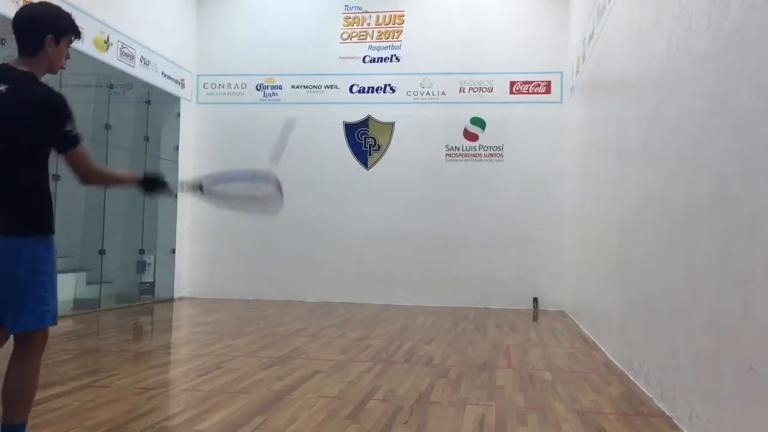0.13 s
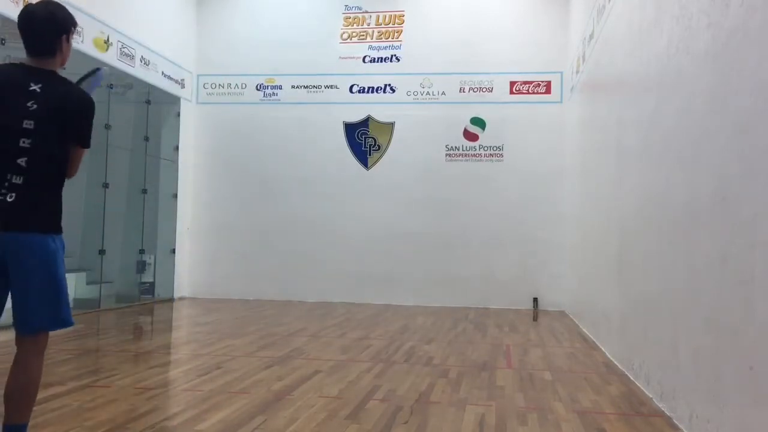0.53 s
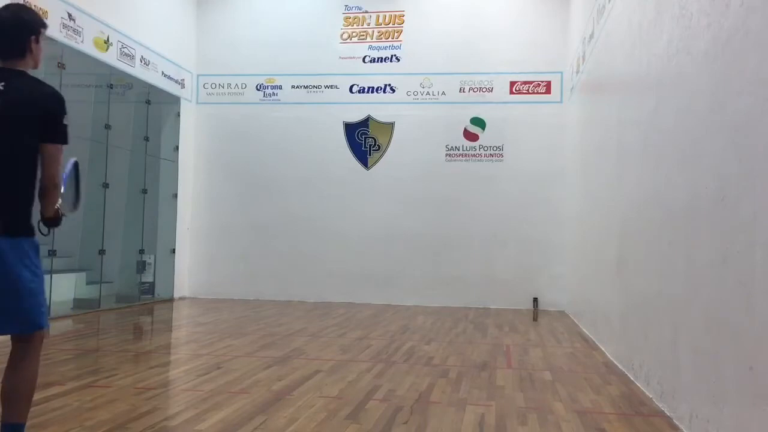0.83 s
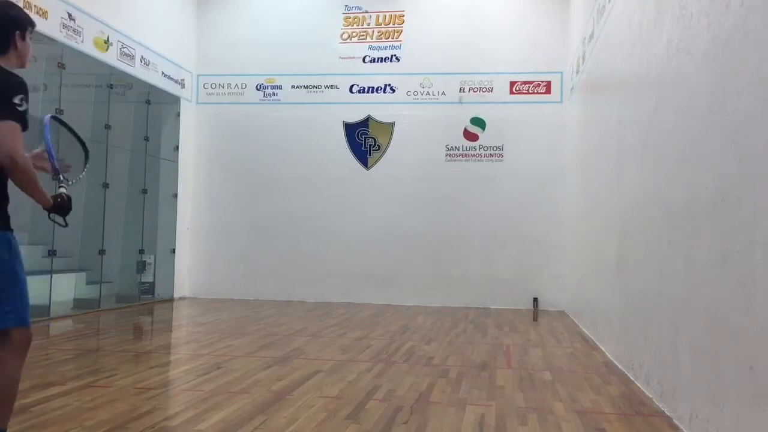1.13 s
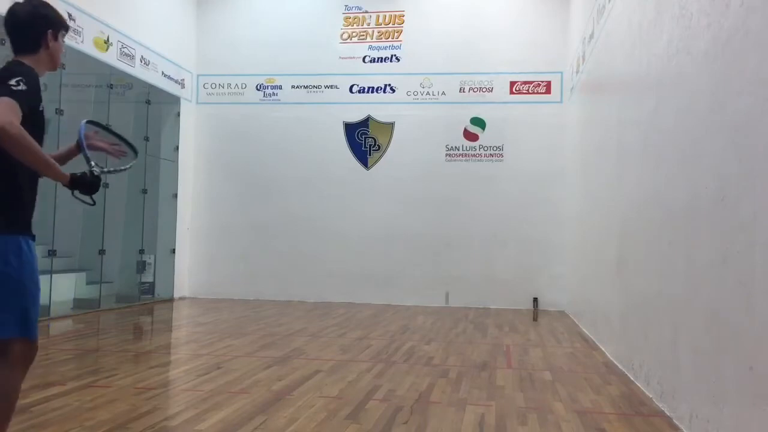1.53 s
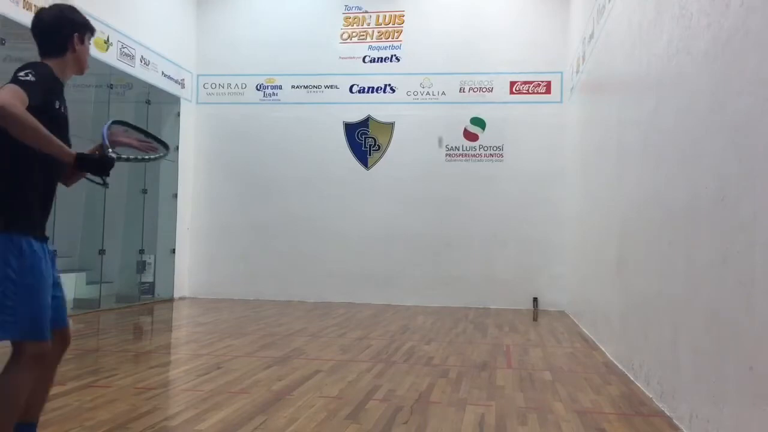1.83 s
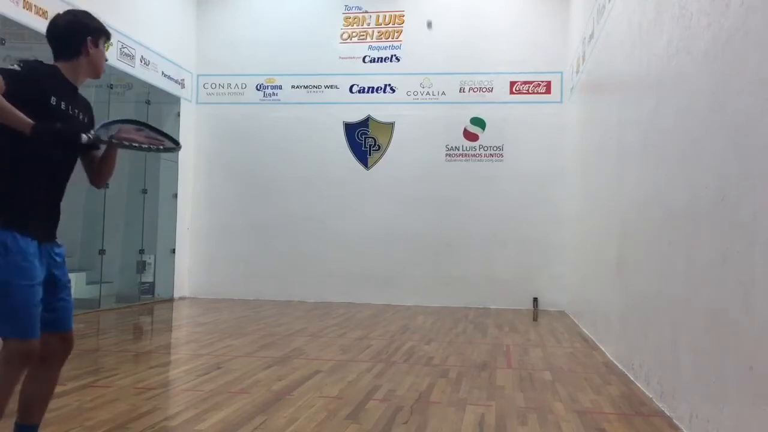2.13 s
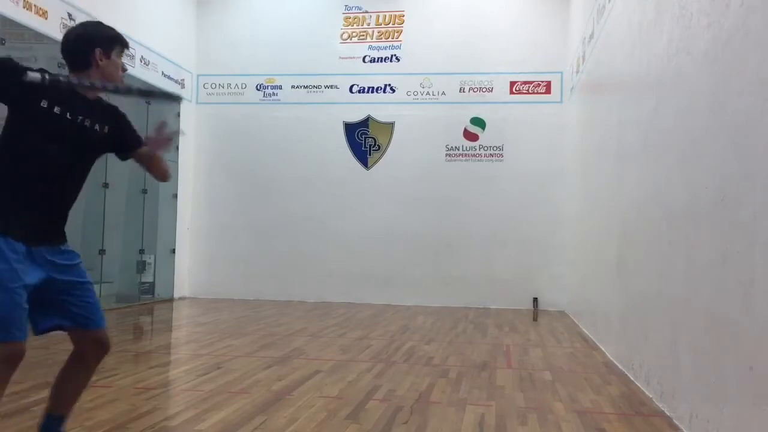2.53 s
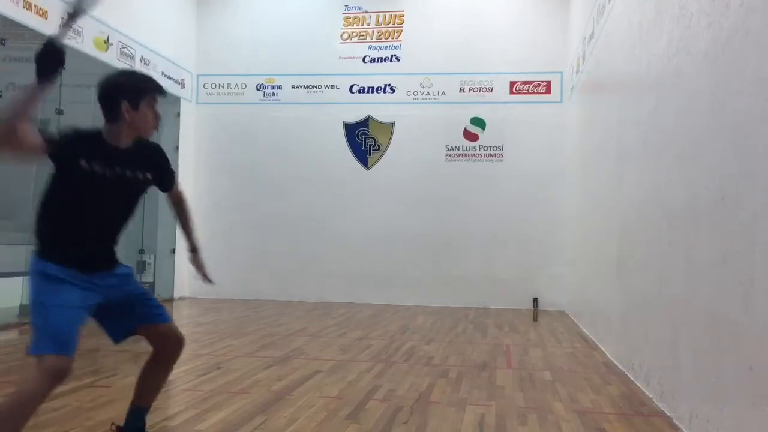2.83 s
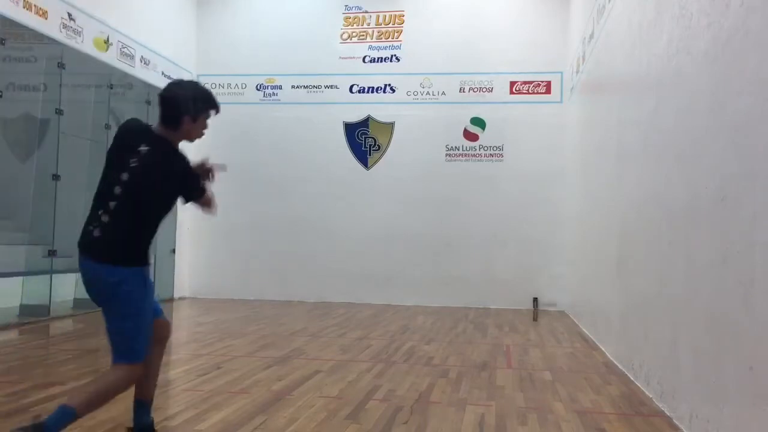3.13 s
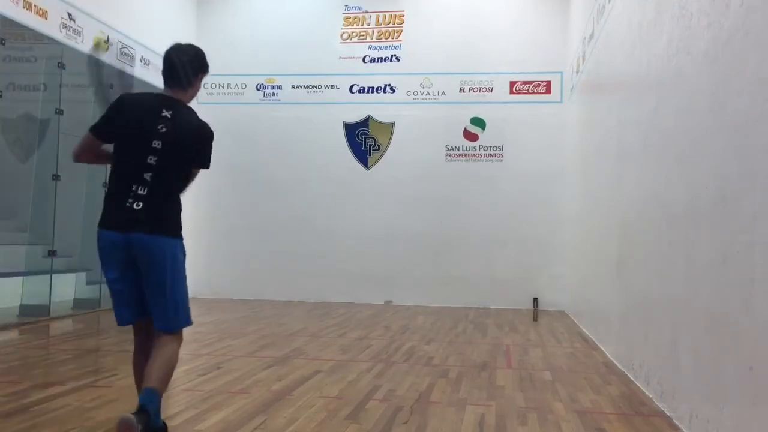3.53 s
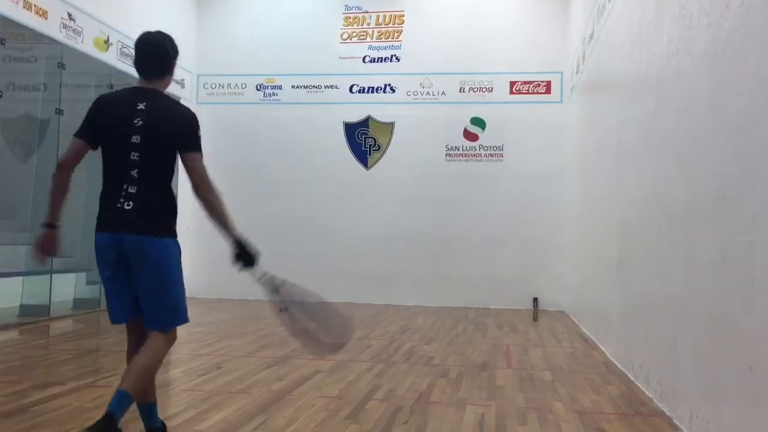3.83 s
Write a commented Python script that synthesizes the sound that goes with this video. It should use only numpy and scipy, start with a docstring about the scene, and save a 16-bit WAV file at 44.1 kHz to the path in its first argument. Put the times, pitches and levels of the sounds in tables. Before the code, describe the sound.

Hollow rubber ball hits and shoe squeaks echo through an indoor court, ending in a loud crack.

```python
"""A closed racquetball court with hard walls and a very long echo, where a player warms up.
He lobs the hollow rubber ball with a soft tap, his shoes thud and squeak, and the ball bounces on the
wooden floor. Then he drives it hard: it cracks against the front wall and drops to the floor.
Every hit sets the air inside the ball ringing. Ventilation hums underneath."""
import sys
import numpy as np
from scipy import signal
from scipy.fft import rfft, irfft
from scipy.io import wavfile
from scipy.ndimage import uniform_filter1d

SR = 44100
rng = np.random.default_rng(int(sys.argv[2]) if len(sys.argv) > 2 else 0)


def int16_out(signal):
    """Quantize to a 16-bit WAV file."""
    q = np.round(np.clip(np.atleast_2d(signal).T, -1, 1) * 32767)
    wavfile.write(sys.argv[1], SR, q.astype(np.int16))


N = 176400

# Hits of the ball: start_s, level_db, ring_hz, extra_ring_db
LOB_TAPS = [(.277, -2, 885, 2.5), (.35, -1, 895, 1), (.912, -6.5, 915, 2)]   # on the strings, then the front wall
BOUNCES = [(-.55, -7.5, 880, 1.5), (1.711, -.2, 830, .7), (3.47, -5, 880, 6)]   # the first comes before the start, so only its echo is heard
DRIVE = (3.172, 0, 880, 0)
WALL_HIT = (3.25, 0, 850, 0)
# Squeaks: start_s, level_db, pitch_hz, extra_squeal_db, length_s. The one at 0.912 s is the ball skidding on
# the front wall; the others are shoes.
SQUEAKS = [(.615, -24, 1530, 19, .06), (.912, -8, 2980, 5, .035), (1.324, -.3, 6450, 2.5, .028)]
# Footsteps on the springy floor: start_s, level_db
STEPS = [(.07, 2), (1.33, -1), (2.22, 0)]
# How strong each kind of knock is from bass to treble: frequency_hz, level_db
TAP_TONE = [(100, 6), (270, 6), (370, -4), (520, 4), (700, 0), (1000, 1.5), (2000, -8.5), (4000, -17),
            (6500, -18), (9000, -29)]
BOUNCE_TONE = [(40, -1), (75, 26), (105, 24), (145, 30), (200, 20), (280, 20), (370, 19), (500, 0),
               (640, 5), (780, 15), (1100, 18), (1400, 7.5), (1800, 8), (3000, 0), (5500, -6), (9000, -19)]
DRIVE_TONE = [(60, 14), (150, 18), (280, 29), (390, 28.5), (510, 16), (640, 26), (780, 35), (1100, 33.5),
              (1350, 20), (1700, 26), (2200, 14), (3200, 13), (6000, 9.5), (9000, -1)]
WALL_TONE = [(60, 15), (130, 24), (210, 35), (330, 30), (500, 23.5), (680, 31.5), (1050, 33), (1300, 31),
             (1500, 25), (1800, 24), (2700, 22), (4500, 18.5), (6500, 18.5), (9000, 9)]
SCUFF_TONE = [(100, 0), (250, 19), (380, 6), (600, 0), (800, 4), (915, 16), (1050, 7), (1400, 4),
              (2500, -3), (4000, -8.5), (6000, -9), (9000, -11.5)]
STEP_TONE = [(40, 0), (130, 17), (200, 9), (270, 13), (420, -3), (1000, -6), (4000, -14), (9000, -40)]
# The air ringing inside the ball: level_db, fade_s (a fade is the time to fall by 60 dB)
TAP_RING = (19, .055)
BOUNCE_RING = (26, .052)
HARD_RING = (34, .028)
# Strong early echoes: delay_s, level_db (compared with the direct sound)
RACQUET_ECHOES = [(.012, 11), (.021, 10), (.0365, 8), (.046, 4)]
FLOOR_ECHOES = [(.011, 4), (.02, 1)]
WALL_ECHOES = [(.012, -1), (.016, -3), (.081, -5), (.089, -5), (.106, -5)]
# Paths to the microphone: direct_db, treble_limit_hz, gap_s (the wait before the long echo)
RACQUET_PATH = (-30, 2000, .003)
FLOOR_PATH = (-24, 7000, .001)
WALL_PATH = (-18.5, 12000, .001)
SHOE_PATH = (-18, 10000, .003)
# How long the court keeps echoing: frequency_hz, fade_s
COURT_FADE = [(80, 4.5), (250, 6), (500, 6), (900, 5.8), (1800, 4.8), (3200, 3.7), (5000, 2.25),
              (7000, 1.55), (10000, 1.0)]
# The rush of the ventilation: frequency_hz, level_db_per_hz
VENT_TONE = [(20, -92), (40, -70), (58, -56), (75, -51), (100, -64), (150, -62.5), (270, -63), (350, -73),
             (480, -75), (700, -73.5), (850, -67.5), (1000, -73), (1300, -77.5), (2000, -82), (3000, -88),
             (4400, -92), (5000, -103.5), (6000, -104), (9000, -118)]

SHORT = 4096   # samples in one knock, squeak or early echo


def ball(hits, tone, ring, path, echoes):
    """Each hit is a knock that sets the hollow ball ringing and echoes round the court."""
    ring_db, fade_s = ring
    out = np.zeros(N)
    for start_s, level_db, ring_hz, extra_ring_db in hits:
        hit = from_db(level_db) * knock(tone, ring_hz, ring_db + extra_ring_db, fade_s)
        out += place(court(hit, path, echoes), start_s)
    return out


def knock(tone, ring_hz=1, ring_db=-200, fade_s=1):
    """A sudden knock with the given tone. The ring of the ball's air is silent unless asked for."""
    hz = np.arange(SHORT // 2 + 1) * SR / SHORT
    width_hz = np.log(1000) / (np.pi * fade_s)
    ring = from_db(ring_db) / (1 + ((hz - ring_hz) / width_hz) ** 2)
    spectrum = np.hypot(from_db(at_hz(tone, hz)), ring)
    # Keep the tone but pack the energy at the very start (minimum phase).
    cepstrum = irfft(np.log(spectrum))
    cepstrum[1:SHORT // 2] *= 2
    cepstrum[SHORT // 2 + 1:] = 0
    return irfft(np.exp(rfft(cepstrum)))


def footsteps():
    """Soles thud on the floorboards."""
    return sum(place(court(from_db(level_db) * knock(STEP_TONE), FLOOR_PATH, []), start_s)
               for start_s, level_db in STEPS)


def squeaks(squeal_db=-15, overtone_step_db=-8, glide_share=.15):
    """A slipping sole, or the ball skidding on the front wall, gives a short rising squeal, with a scuff
    halfway through."""
    t = np.arange(SHORT) / SR
    out = np.zeros(N)
    for start_s, level_db, pitch_hz, extra_squeal_db, length_s in SQUEAKS:
        progress = np.minimum(t / length_s, 1)
        slip = np.sin(np.pi * progress)
        rising_hz = pitch_hz * (1 + glide_share * (progress - .5))
        phase = 2 * np.pi * np.cumsum(rising_hz) / SR
        squeal = sum(from_db(overtone_step_db * k) * np.sin((k + 1) * phase) for k in range(3))
        squeal *= from_db(squeal_db + extra_squeal_db) * slip / np.linalg.norm(slip)
        scuff = place(knock(SCUFF_TONE), length_s / 2)[:SHORT]
        out += place(court(from_db(level_db) * (scuff + squeal), SHOE_PATH, []), start_s)
    return out


def court(sound, path, echoes, build_s=.008, flutter_db=1.8, flutter_s=.005, gain_db=15):
    """The direct sound, early echoes off the walls, then a long fluttering tail whose treble dies first."""
    direct_db, treble_limit_hz, gap_s = path
    hz, times_s, noise = signal.stft(rng.standard_normal(N + SR), SR, nperseg=512)
    fade = from_db(-60 * times_s / at_hz(COURT_FADE, hz)[:, None])
    _, tail = signal.istft(noise * fade, SR)
    t = np.arange(len(tail)) / SR
    flutter = np.interp(t / flutter_s, np.arange(SHORT), rng.standard_normal(SHORT))
    build_up = 1 - np.exp(-np.maximum(t - gap_s, 0) / build_s)
    response = tail * build_up * from_db(flutter_db * flutter) / np.sqrt(SR)
    response[:SHORT] += from_db(direct_db) * low_pass(arrival(), treble_limit_hz)
    for delay_s, level_db in echoes:
        i = int(delay_s * SR)
        response[i:i + SHORT] += from_db(direct_db + level_db) * arrival()
    return signal.fftconvolve(sound, response) * from_db(gain_db)


def arrival(split_hz=1700, scatter_s=.007):
    """One arrival of a sound: a clean click in the bass, scattered over milliseconds in the treble."""
    t = np.arange(SHORT) / SR
    click = 1. * (t == 0)
    scatter = rng.standard_normal(SHORT) * np.exp(-t / scatter_s)
    high_pass = signal.butter(2, split_hz, "high", fs=SR, output="sos")
    treble = signal.sosfilt(high_pass, scatter / np.linalg.norm(scatter))
    return low_pass(click, split_hz) + treble


def ventilation(hum_hz=75.3, hum_db=-40):
    """A steady rush of air with a low fan hum."""
    hz = np.arange(N // 2 + 1) * SR / N
    spectrum = rfft(rng.standard_normal(N)) * from_db(at_hz(VENT_TONE, hz))
    rush = irfft(spectrum, N) * np.sqrt(SR / 2)
    phase = 2 * np.pi * (hum_hz * np.arange(N) / SR + rng.random())
    return rush + from_db(hum_db) * np.sqrt(2) * np.sin(phase)


def from_db(db):
    """Turn decibels into a number to multiply by."""
    return 10 ** (np.asarray(db) / 20)


def at_hz(table, hz):
    """Read between a table's rows, with every octave equally wide."""
    row_hz, values = np.transpose(table)
    return np.interp(np.log(np.maximum(hz, 1)), np.log(row_hz), values)


def place(sound, start_s):
    """Start a sound at a given time, which may lie before the beginning."""
    i = int(round(start_s * SR))
    return np.pad(sound[max(-i, 0):], (max(i, 0), N))[:N]


def low_pass(sound, hz):
    """Soften the treble above hz."""
    return signal.sosfilt(signal.butter(2, hz, fs=SR, output="sos"), sound)


def scene():
    """All sounds of the court at one microphone."""
    lob = ball(LOB_TAPS, TAP_TONE, TAP_RING, RACQUET_PATH, RACQUET_ECHOES)
    bounces = ball(BOUNCES, BOUNCE_TONE, BOUNCE_RING, FLOOR_PATH, FLOOR_ECHOES)
    drive = ball([DRIVE], DRIVE_TONE, HARD_RING, RACQUET_PATH, RACQUET_ECHOES)
    crack = ball([WALL_HIT], WALL_TONE, HARD_RING, WALL_PATH, WALL_ECHOES)
    return (lob + bounces + drive + crack + footsteps() + squeaks() + ventilation())[None]


def record(dry, limit_db=-10.4, release_db_per_s=14, ceiling=.72, cutoff_hz=8900):
    """A limiter turns the loudest hits down, peaks are rounded off and the highest treble is cut."""
    power = uniform_filter1d(dry[0] ** 2, size=441)
    over_db = np.maximum(10 * np.log10(np.maximum(power, 1e-12)) - limit_db, 0)
    # The volume drops quickly and comes back slowly.
    recovery_db = release_db_per_s * np.arange(N) / SR
    cut_db = np.maximum.accumulate(over_db + recovery_db) - recovery_db
    held = dry * from_db(-uniform_filter1d(cut_db, size=220))
    rounded = held / (1 + (held / ceiling) ** 6) ** (1 / 6)
    return signal.sosfilt(signal.ellip(10, .3, 70, cutoff_hz, fs=SR, output="sos"), rounded)


dry = scene()
out = record(dry)
int16_out(out)
```